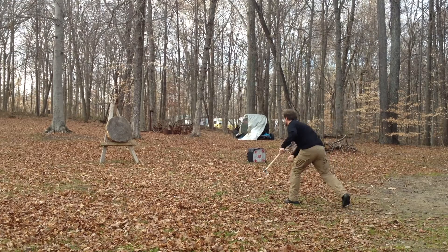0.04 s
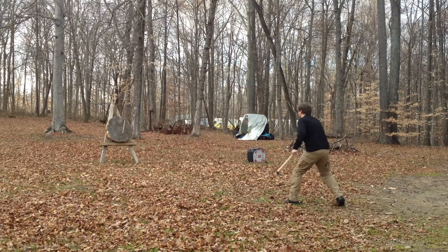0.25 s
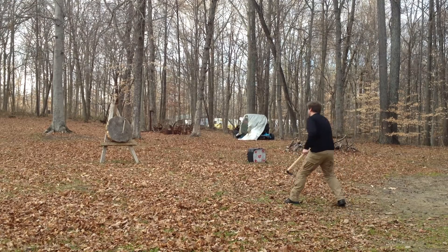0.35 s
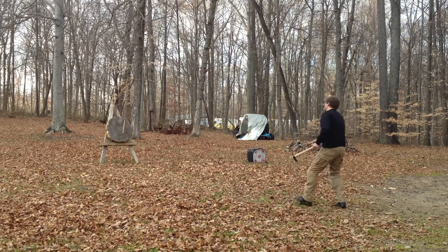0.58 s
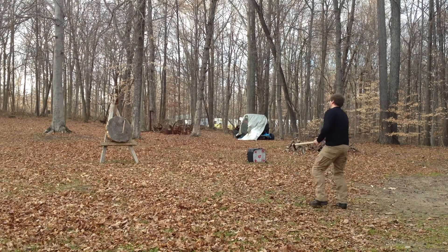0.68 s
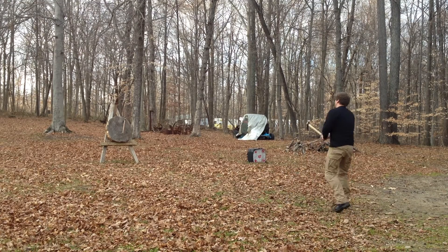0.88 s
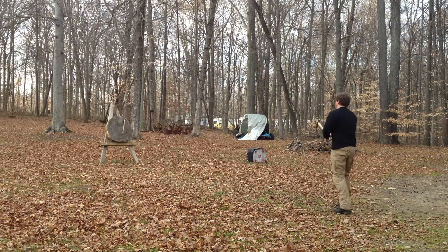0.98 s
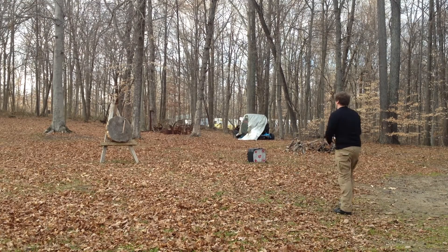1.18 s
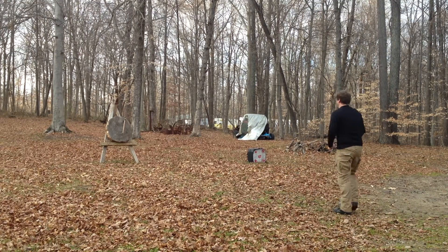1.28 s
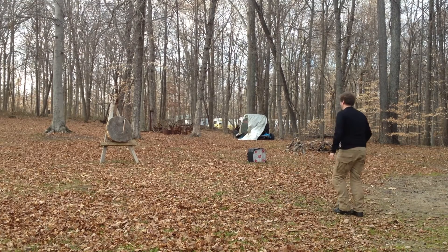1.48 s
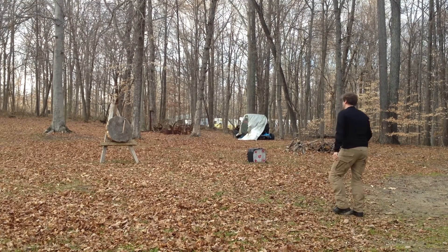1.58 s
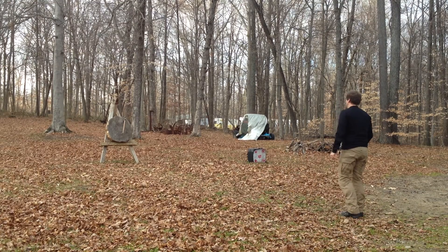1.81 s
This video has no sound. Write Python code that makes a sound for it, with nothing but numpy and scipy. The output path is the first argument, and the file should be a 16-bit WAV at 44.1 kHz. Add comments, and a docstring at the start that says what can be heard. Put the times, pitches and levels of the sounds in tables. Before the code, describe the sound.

In a quiet wood, an axe hits a wooden target with one crisp thud, a few metres from the microphone. A thin echo fades as the thrower takes two light steps, dry leaves rustling and snapping underfoot.

```python
"""A short crunch and a woody thud: a thrown axe bites into a slab on a stand, a few metres away.
The blade splits the fibres, the blow rings the slab, and the trunks of a bare autumn wood scatter it back.
The thrower then takes two steps through dry leaves, which crackle, snap and settle
over a faint outdoor hush."""
import sys
import numpy as np
from scipy import signal
from scipy.fft import rfft, irfft
from scipy.io import wavfile

SR = 44100
rng = np.random.default_rng(int(sys.argv[2]) if len(sys.argv) > 2 else 0)


def transcribe(signal):
    """Save signal, clipped to [-1, 1], as a 16-bit WAV file at the path in sys.argv[1]."""
    frames = np.atleast_2d(signal).T
    limited = np.clip(frames, -1, 1)
    pcm = np.round(limited * 32767).astype(np.int16)
    wavfile.write(sys.argv[1], SR, pcm)


N = 81585
TIME = np.arange(N) / SR
SCATTER_START_S = 0.21


def axe():
    """The blows ring the slab while the blade crunches through the fibres until it sticks."""
    # blade meets wood, head drives home, handle jolts: t/s, level/dB, contact time/ms
    blows = [(0.2016, -22.5, 0.36), (0.2052, 0, 0.31), (0.2145, -18.5, 0.1), (0.2172, -19, 0.093)]
    # ringing modes of slab and axe: f/Hz, level/dB, t60/s
    modes = [(209, -23.5, .055), (272, -23.5, 0.029), (379, -28.5, 0.032), (603, -38, 0.054),
             (678, -38.5, 0.043), (900, -29, 0.029), (1075, -23.5, 0.018), (1330, -50, 0.059),
             (1526, -36, 0.072), (1644, -37.5, 0.047), (2550, -41, .04), (3900, -28.5, 0.038),
             (4300, -34, 0.04), (5600, -21.5, 0.046), (5840, -16, 0.028)]
    # fibres give way in quick spurts as the blade wedges in: t/s, level/dB
    spurts = [(0.202, -30.5), (0.2056, -34), (0.2119, -34.5), (0.2166, -35), (0.2188, -39)]
    # tone of the splitting fibres: f/Hz, level/dB
    split_colour = [(70, -44), (200, -2.5), (600, 1), (1300, -1.5), (2000, -7), (3200, -3), (4800, -8),
                    (5900, 6), (7200, -6.5), (9000, -12), (11000, -34), (15000, -26)]
    force = sum(from_db(db) * push(s, ms / 1000) for s, db, ms in blows)
    thud = sum(from_db(db) * ring(force, hz, t60) for hz, db, t60 in modes)
    wedge = np.sqrt(sum((from_db(db) * dying(s, t60=0.035)) ** 2 for s, db in spurts))
    crunch = wedge * colour(grains(per_s=9000, spread_db=0.7), split_colour)
    return high_pass(thud, hz=146) + crunch  # the slab is too small to radiate deep bass


def trunk_echoes(hit):
    """The biggest trunks each throw back one band of the hit."""
    # single returns: delay/s, level/dB, centre f/Hz
    returns = [(0.031, -22, 248), (.06, -22, 173), (0.104, -28.5, 192), (.108, -19, 1190),
               (0.127, -26, 250), (.168, -33, 231), (0.171, -22.5, 2600)]
    out = 0
    for delay, db, hz in returns:
        late = np.interp(TIME - delay, TIME, hit, left=0) + 1e-18
        out = out + from_db(db) * double_resonance(late, hz, width_hz=hz)
    return out


def trunk_scatter():
    """Quick scatter from the ground and near trees, then a long thin tail from the wood."""
    # scattered blow per third octave: f/Hz, early level/dB, late level/dB, late t60/s
    wood = [(89.5, -67, -81, 0.71), (143, -52.5, -60, 0.81), (200, -40.5, -59.5, 1.68),
            (308, -49, -62.5, 1.2), (426, -54, -70.5, 2.7), (604, -47, -64.5, 2.7), (716, -65, -73, 2.5),
            (913, -66, -64, 2.44), (1230, -57, -70, 2.7), (1820, -57.5, -69, 2), (2530, -49, -70.5, 2.3),
            (4000, -66, -66.5, 1.2), (4700, -46, -72, 1.2), (6100, -59, -49, 0.48),
            (8400, -63, -67.5, 0.33), (13700, -85, -80, 0.32)]
    hz, *columns = np.transpose(wood)
    edges = 1000 * 2 ** (np.arange(-12, 13) / 3)
    out = 0
    for low, high in zip(edges, edges[1:]):
        early_db, late_db, t60 = (np.interp(np.log(low * high) / 2, np.log(hz), c) for c in columns)
        early = from_db(early_db) * dying(SCATTER_START_S, t60=0.17)
        late = from_db(late_db) * dying(SCATTER_START_S, t60)
        band = signal.butter(3, [low, high], "band", fs=SR, output="sos")
        reflections = signal.sosfilt(band, grains(per_s=3000, spread_db=2.0) + 1e-18)
        out = out + np.hypot(early, late) * rms_one(reflections)
    return out


def lingering_rings():
    """Narrow, diffuse rings carried back by the wood."""
    # pitches of the blow that hang in the echo: f/Hz, width/Hz, level/dB, t60/s
    pitches = [(897, 120, -63, 1.4), (3990, 220, -58, 0.43)]
    out = 0
    for hz, width_hz, db, t60 in pitches:
        band = rms_one(double_resonance(rng.standard_normal(N), hz, width_hz))
        out = out + from_db(db) * dying(SCATTER_START_S, t60) * band
    return out


def leaves():
    """Fine crackle follows the feet; under full weight a duller crush joins it."""
    # envelopes of the brushing and of the crush under the sole: t/s, level/dB
    brush_curve = [(0, -63.5), (.11, -66), (.17, -68.5), (.48, -69), (.53, -58), (.59, -48), (.64, -47),
                   (.68, -52.5), (.705, -59.5), (.725, -54), (.745, -60), (.83, -67), (.93, -62.5),
                   (1.0, -68.5), (1.09, -71.5), (1.15, -57.5), (1.19, -47.5), (1.225, -55), (1.29, -51),
                   (1.36, -51.5), (1.405, -50.5), (1.43, -57.5), (1.48, -65.5), (1.58, -65), (1.78, -69.5),
                   (1.85, -63)]
    crush_curve = [(0, -96), (.52, -76), (.56, -58.5), (.61, -57.5), (.67, -60), (.7, -67), (.75, -67.5),
                   (.8, -82), (1.08, -75), (1.14, -67.5), (1.195, -57), (1.22, -61.5), (1.3, -54.5),
                   (1.37, -66.5), (1.405, -58.5), (1.46, -74.5), (1.85, -76)]
    # tone of brushed and of crushed leaves: f/Hz, level/dB
    brush_colour = [(300, -35.5), (2000, -37.5), (4000, -15), (5200, -9), (6100, 4), (6900, -1), (8000, -6),
                    (10000, -12.5), (12500, -15.5), (15500, -16.5)]
    crush_colour = [(100, -9), (500, -10), (1100, -3), (1900, -6), (2800, -3.5), (4000, 1.5), (5500, 2),
                    (9000, -16.5), (15000, -20)]
    brush_db, crush_db = (np.interp(TIME, *np.transpose(curve)) for curve in (brush_curve, crush_curve))
    brush = from_db(brush_db) * colour(grains(per_s=7500, spread_db=3.5), brush_colour)
    crush = from_db(crush_db) * colour(grains(per_s=3000, spread_db=3.3), crush_colour)
    return brush + crush


def snaps():
    """Each snap is a tiny burst of fractures that rings its leaf; thicker stalks add a lower bite."""
    # single leaves and twigs breaking: t/s, peak level/dB, leaf f/Hz, relative bite level/dB
    breaks = [(0.515, -36, 6700, -24), (.5285, -50, 8000, -26), (0.54, -42, 7800, -26),
              (.5742, -33, 7500, -33), (0.6115, -35, 6700, -10), (.6235, -29.5, 6500, -15),
              (0.6266, -37, 8200, -22), (0.6367, -33.5, 6550, -12.5), (0.648, -33.5, 6950, -15),
              (0.671, -48, 6150, -2), (0.72, -34, 6850, -6), (0.7247, -34, 5930, -6),
              (0.8642, -37, 6310, -25), (1.1103, -49, 6140, -6), (1.177, -41, 6100, -13),
              (1.185, -40, 6400, -14), (1.1956, -32.5, 6640, -10), (1.2553, -34, 5730, -9),
              (1.2894, -32, 5600, -18), (1.305, -37, 5860, -8.5), (1.3371, -37.5, 5930, -7.5),
              (1.3847, -33.5, 6550, -15), (1.401, -35, 6400, -5.5), (1.404, -36, 6440, -16),
              (1.451, -42, 5700, -11), (1.5106, -43, 6200, -19), (1.5753, -50.5, 8700, -12),
              (1.7335, -45, 6450, -12.5), (1.8125, -45, 9500, -17)]
    low_cut_hz, crack_db = 4230, -19
    out = 0
    for s, db, hz, bite_db in breaks:
        burst = rng.standard_normal(N) * dying(s, t60=0.013) + 1e-18
        leaf = high_pass(resonance(burst, hz, width_hz=750), low_cut_hz)
        stalk = double_resonance(burst, hz=3650, width_hz=1340)
        crack = high_pass(burst, low_cut_hz)  # the broad, bright edge
        snap = rms_one(leaf) + from_db(bite_db) * rms_one(stalk) + from_db(crack_db) * rms_one(crack)
        out = out + from_db(db) * snap / np.abs(snap).max()
    return out


def heels():
    """Each heel sets down with a soft, low bump in the soil."""
    # heel contacts: t/s, level/dB
    footfalls = [(0.774, -48.5), (1.425, -55.5)]
    force = sum(from_db(db) * push(s, length_s=0.0012) for s, db in footfalls)
    return high_pass(ring(force, hz=188.5, t60=0.036), hz=120.5)


def hush():
    """Far wind and hiss make a faint, steady bed."""
    # tone of the outdoor air: f/Hz, level/dB
    air_colour = [(25, 12.5), (55, -6), (105, 8.5), (180, 2), (300, -5.5), (550, -9), (1000, -11),
                  (2000, -13.5), (4500, -13), (6300, -13.5), (8500, -35), (11000, -23.5), (15000, -20)]
    return from_db(-66.5) * colour(rng.standard_normal(N), air_colour)


def from_db(db):
    """Decibels to gain."""
    return 10 ** (np.asarray(db) / 20)


def rms_one(x):
    """Scale to rms 1."""
    return x / np.sqrt(np.mean(x ** 2) + 1e-20)


def colour(x, spectrum):
    """Causal (minimum-phase) EQ with the given curve; the result has rms 1."""
    hz, db = np.transpose(spectrum)
    size = 2 * N
    grid = np.maximum(np.fft.rfftfreq(size, 1 / SR), 1)
    gain = from_db(np.interp(np.log(grid), np.log(hz), db))
    cepstrum = irfft(np.log(gain))
    cepstrum[1:N] *= 2
    cepstrum[N + 1:] = 0
    return rms_one(irfft(rfft(x, size) * np.exp(rfft(cepstrum)))[:N])


def ring(x, hz, t60):
    """A unit click sets a sine of height 1 ringing."""
    r, w = from_db(-60 / (t60 * SR)), 2 * np.pi * hz / SR
    return signal.lfilter([0, np.sin(w)], [1, -2 * r * np.cos(w), r * r], x + 1e-18)


def dying(start, t60):
    """Envelope that jumps to 1 and dies away."""
    return (TIME >= start) * np.exp(-np.log(1000) * np.maximum(TIME - start, 0) / t60)


def push(start, length_s):
    """One smooth contact of unit area."""
    progress = np.clip((TIME - start) / max(length_s, 3 / SR), 0, 1)
    pulse = np.sin(np.pi * progress) ** 2
    return pulse / (pulse.sum() + 1e-12)


def grains(per_s, spread_db):
    """Random clicks, many small and a few large."""
    sizes = from_db(spread_db * np.minimum(rng.exponential(1, N), 5))
    return sizes * rng.choice([-1, 1], N) * (rng.random(N) < per_s / SR)


def high_pass(x, hz):
    """Shed what lies below hz."""
    return signal.sosfilt(signal.butter(2, hz, "high", fs=SR, output="sos"), x)


def resonance(x, hz, width_hz):
    """A broad peak with gain 1 on top."""
    return signal.lfilter(*signal.iirpeak(hz, hz / width_hz, fs=SR), x)


def double_resonance(x, hz, width_hz):
    """The same peak twice, for steeper skirts."""
    return resonance(resonance(x, hz, width_hz), hz, width_hz)


def scene():
    """The hit and its echo, the steps and the hush, in mono."""
    hit = axe()
    bed = hush()
    echo = trunk_scatter() + trunk_echoes(hit)
    steps = leaves() + snaps() + heels()
    return (hit + echo + lingering_rings() + steps + bed)[None]


def record(dry):
    """The microphone sheds the deep bass; the top is cut steeply."""
    low_cut_hz, high_cut_hz = 137, 15450
    top_cut = signal.ellip(10, .1, 70, high_cut_hz, fs=SR, output="sos")
    return signal.sosfilt(top_cut, high_pass(dry, low_cut_hz))


dry = scene()
out = record(dry)
transcribe(out)
```